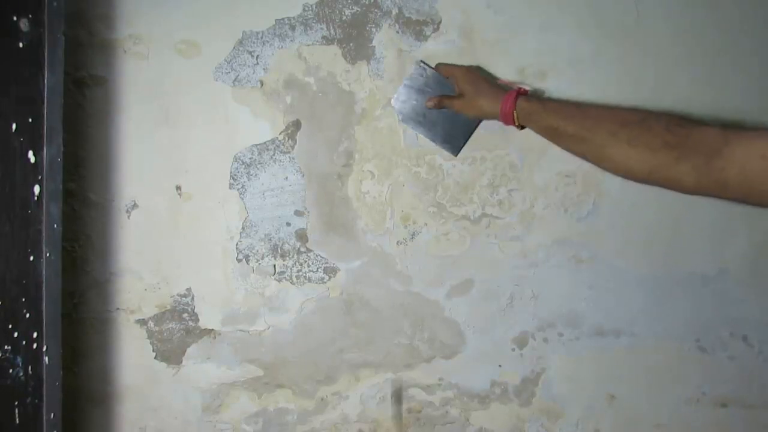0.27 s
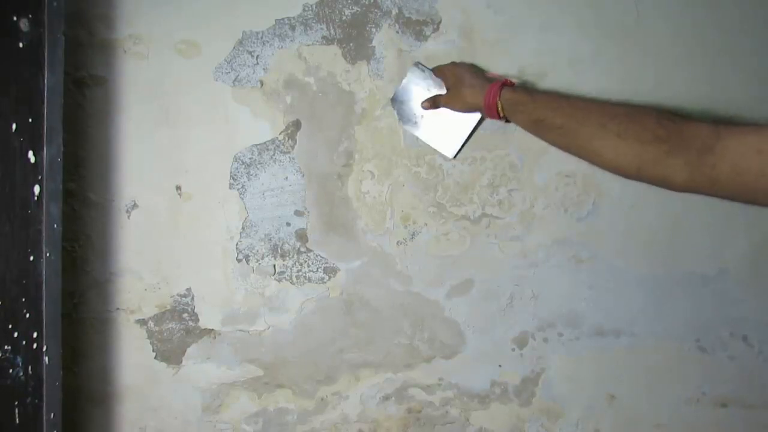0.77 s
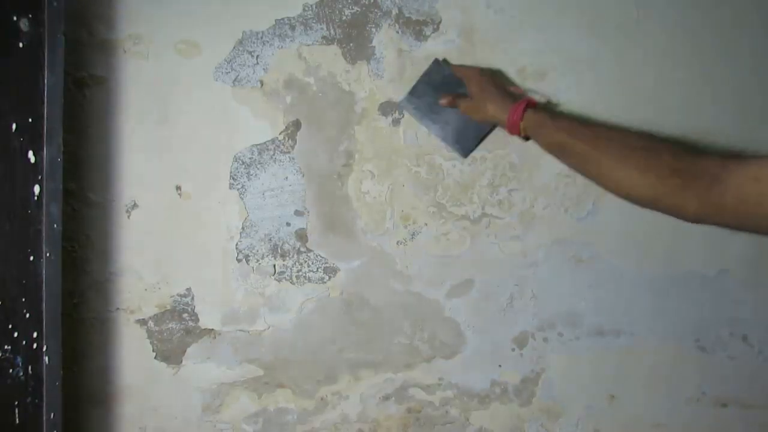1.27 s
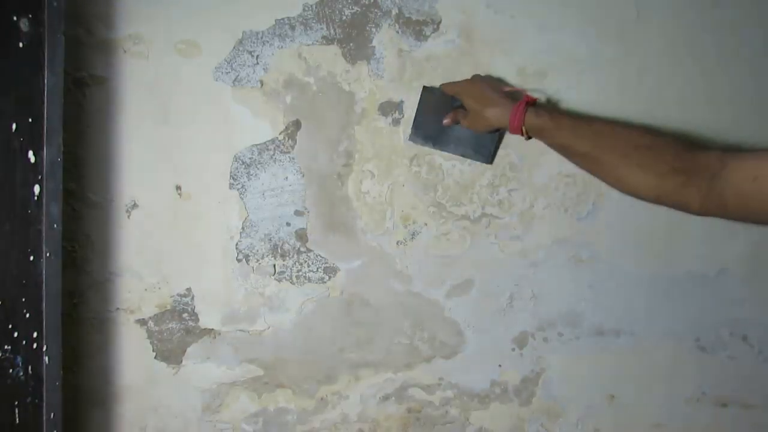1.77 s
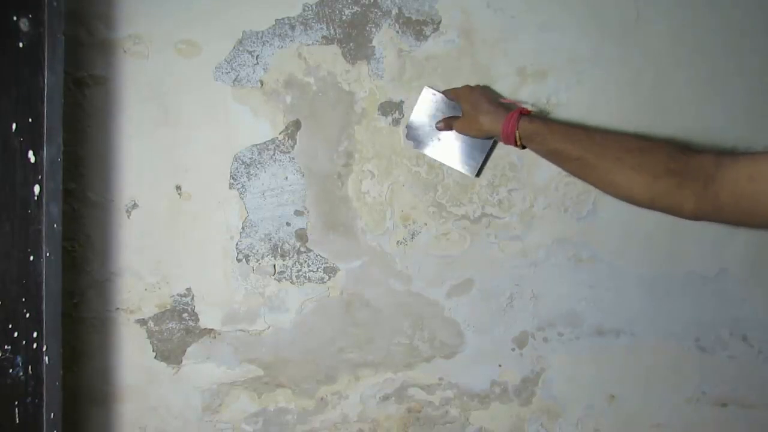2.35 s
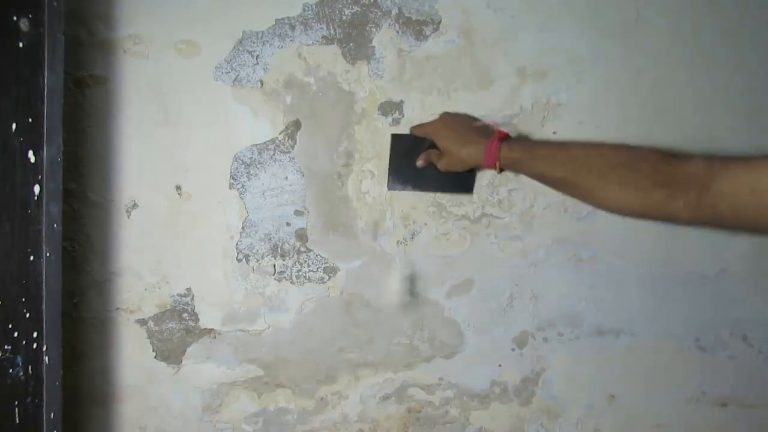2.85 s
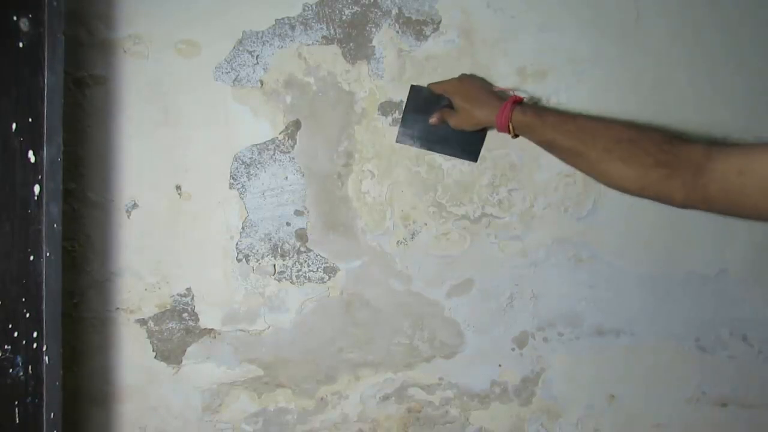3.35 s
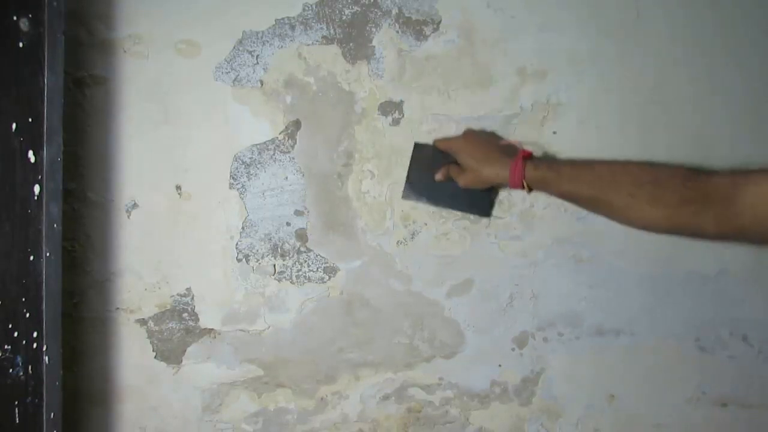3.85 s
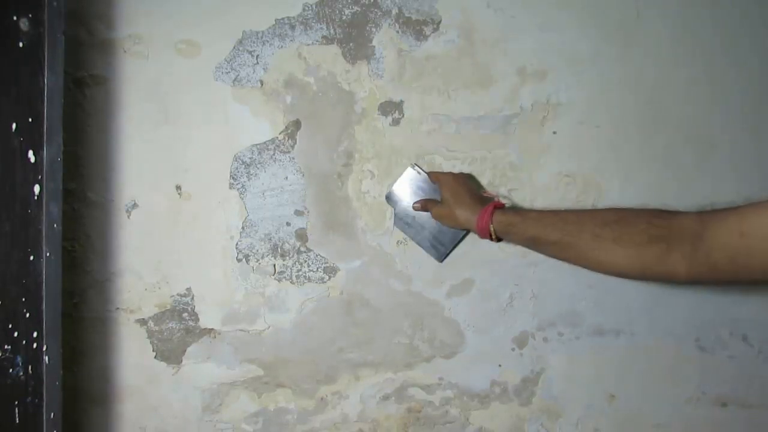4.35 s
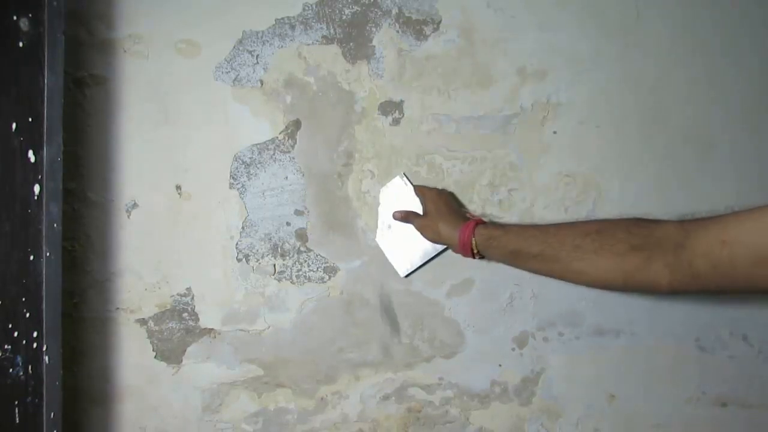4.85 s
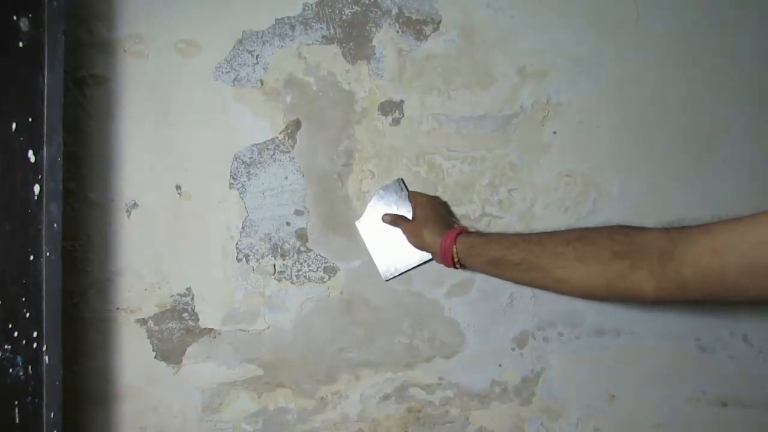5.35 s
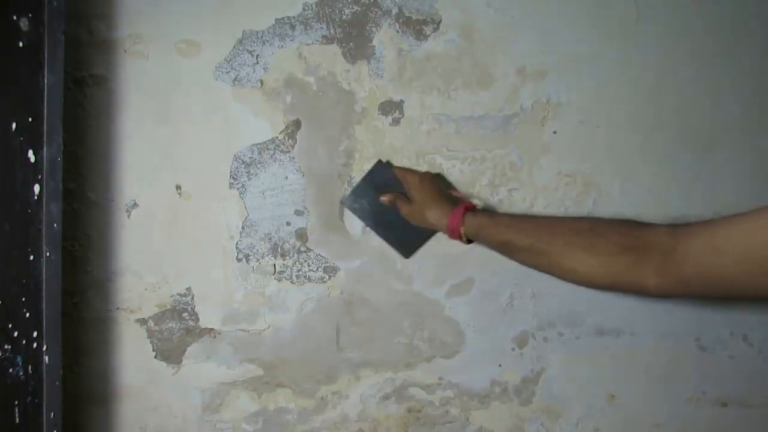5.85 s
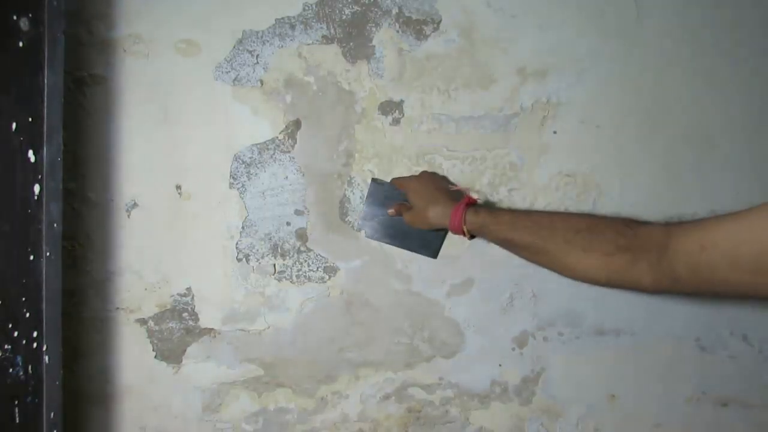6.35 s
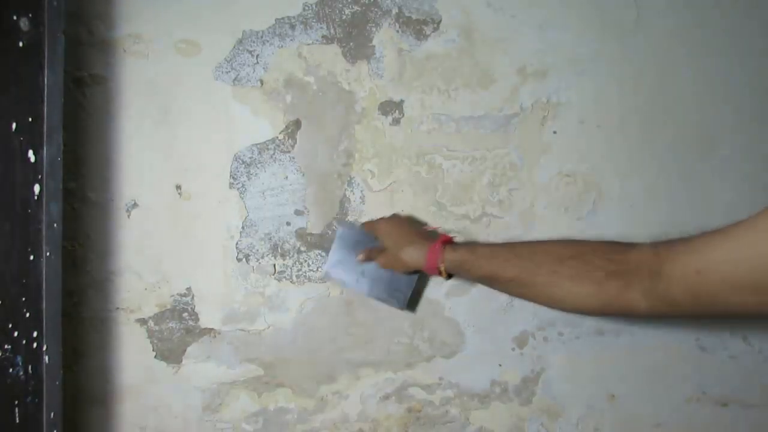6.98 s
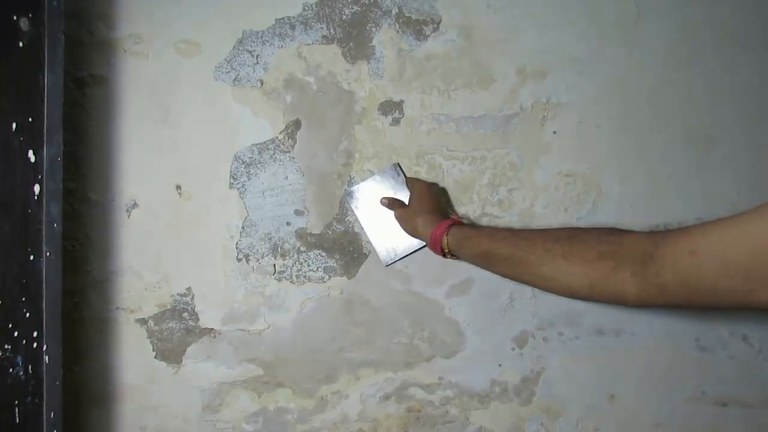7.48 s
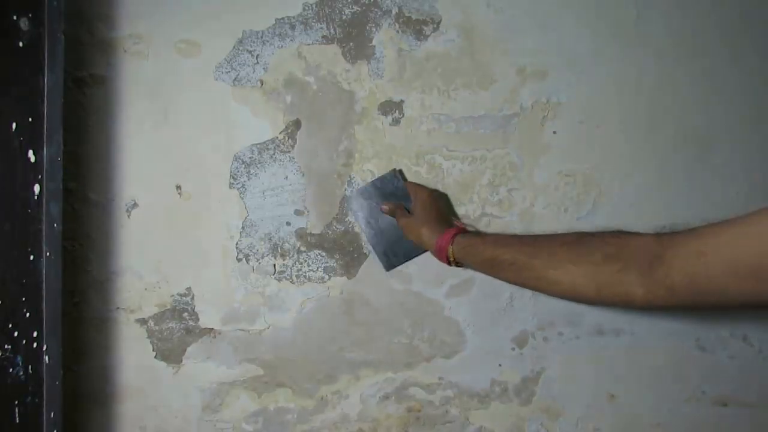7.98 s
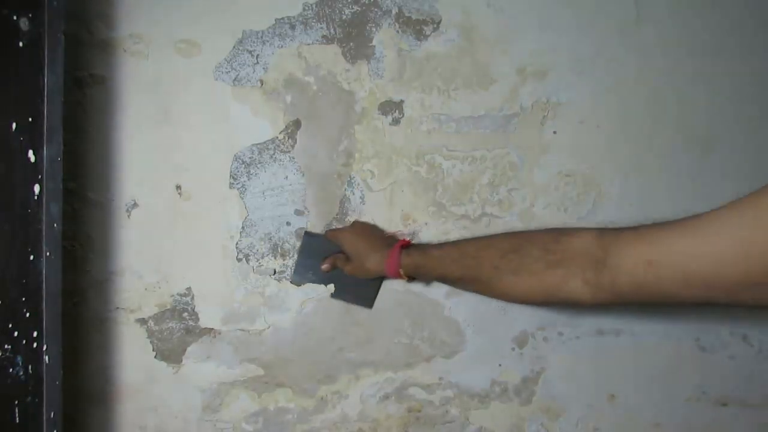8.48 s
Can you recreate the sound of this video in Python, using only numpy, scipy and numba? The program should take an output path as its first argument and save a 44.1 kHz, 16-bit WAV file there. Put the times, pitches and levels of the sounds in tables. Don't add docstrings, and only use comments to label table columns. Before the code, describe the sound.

Short gritty scrapes of a metal scraper break brittle plaster off a hard wall in irregular snaps, over faint traffic rumble.

```python
import sys
import numpy as np
from scipy import signal
from scipy.fft import rfft, irfft
from scipy.io import wavfile
from scipy.ndimage import uniform_filter1d, minimum_filter1d
from numba import njit

SR = 44100
rng = np.random.default_rng(int(sys.argv[2]) if len(sys.argv) > 2 else 0)


def materialize(psi):
    bounded = np.clip(np.atleast_2d(psi).T, -1, 1)
    quanta = np.round(bounded * 32767).astype(np.int16)
    wavfile.write(sys.argv[1], SR, quanta)


def natural_amplitude(level_db):
    exponent = np.asarray(level_db, float) / 20
    return 10 ** exponent


N = 384552

# (t/s, peak level/dB, ring f/Hz)
FLAKE_SNAPS = [(0.2418, 1, 7500), (1.0768, -14.5, 8200), (1.1054, 6.5, 4800), (2.9008, -3, 9100),
               (3.0806, -14, 10000), (4.8667, 5, 7500), (5.1769, 6, 6470), (5.6771, -4.5, 7840),
               (5.721, -4, 8450), (5.7818, -5, 8520), (5.84, 0.5, 8400), (6.223, -3.5, 9700),
               (6.3148, 0.5, 6650), (7.0787, -12, 5870), (8.7028, -5, 7900)]
# (t/s, peak level/dB, ring f/Hz, snap level re ring/dB)
EDGE_CATCHES = [(0.3606, -7.5, 2050, -15), (0.4913, -16.5, 1660, -10), (0.5611, -9, 1740, -34),
                (0.634, -13, 1680, -16), (1.3773, -7, 2350, -12), (2.6668, -7.5, 1760, 0),
                (2.7656, -4, 1720, -5), (3.4381, 6, 2500, -14), (3.7599, -13.5, 2070, -29),
                (4.4044, -6, 1610, -9), (4.4179, 9, 1830, -10), (4.8379, -2, 1820, -8),
                (5.6456, -9, 1610, -24), (5.9434, -4.5, 1860, -20), (6.2357, -2, 2490, -16),
                (6.3616, -8.5, 1740, -8), (6.5889, -5, 1780, -16), (6.9835, -19.5, 1680, -8),
                (7.7674, -14, 1770, -31), (7.9229, -8.5, 1910, -5.5), (8.2137, -10, 1520, -18),
                (8.4672, -9, 1480, -20)]
# (t/s, peak level/dB, ring f/Hz, snap level re ring/dB)
PLASTER_CRACKS = [(0.1278, -8.5, 1700, 3.5), (0.5877, 3, 1800, -8), (0.758, -2.5, 1800, -4.5),
                  (0.7983, -10.5, 2270, -6), (0.8929, -4.5, 1930, 0), (0.9555, 4.5, 1600, -3),
                  (1.5652, -1.5, 3060, 4), (1.7673, -3.5, 2260, 1.5), (1.9358, -12.5, 2640, -2),
                  (1.9805, -8.5, 2510, -3), (2.0512, 6.5, 1740, 3), (2.3082, -8.5, 1910, 2.5),
                  (2.4925, 0, 2270, -1.5), (2.5537, 12, 2060, 6.5), (2.9946, -9.5, 2450, 0),
                  (4.0178, -8.5, 1810, 3.5), (4.2764, -4.5, 1930, -4), (4.2896, -5.5, 3170, -19),
                  (4.514, 1.5, 1680, -2), (5.3294, 1, 2900, 0), (5.44, -2, 1960, 2.5),
                  (6.0071, 5, 2940, 2.5), (6.1456, -19.5, 2860, 0.5), (6.4472, -3.5, 1910, 1),
                  (6.7979, 0.5, 3150, 2.5)]


def rasp():
    # (f/Hz, level per Hz/dB)
    grit_colour = [(1470, -55), (2500, -12.5), (3610, -3.5), (6520, -3), (8840, -4), (9930, -6),
                   (13600, -12.5), (16100, -23)]
    blade_db, grit_db, wall_db, bend_hz = hand()
    stutter_db = 0.8 * walk(45) + 1.3 * walk(130)

    slips = grains(per_s=1300, spread_db=3, top_db=10, smear_s=0.0014)
    bend_hz = bend_hz * (1 + 0.04 * walk(25))
    bend = svf(svf(slips, bend_hz, 2100.0), bend_hz, 1070.0)
    steel = level(bend, -1.23) + level(blade(slips), -7.5)
    wall = level(band(band(slips, 860, 1000), 860, 1000), -9.5)

    dust = grains(per_s=2200, spread_db=3.2, top_db=11, smear_s=0.0007)
    grit = level(colour(dust, grit_colour), -0.8) + natural_amplitude(-5) * chips()
    uneven_grit = natural_amplitude(grit_db + 1.67 * walk(90)) * grit
    return natural_amplitude(blade_db - 0.5 + stutter_db) * (steel - natural_amplitude(wall_db) * wall + uneven_grit)


def hand():
    # (start t/s, length t/s, blade level/dB, grit level re blade/dB, bend f/Hz)
    pushes = [(0.602, 0.11, -10, -7.5, 1850), (1.327, 0.081, -27, -2, 2400), (1.421, 0.083, -16, -1, 3300),
              (1.523, 0.054, -17.5, -3, 3000), (1.827, 0.029, -29, -23, 2400),
              (2.116, 0.051, -21.5, -2, 1900), (2.283, 0.066, -20.5, -9, 2000),
              (2.379, 0.12, -25.5, -3.5, 2250), (2.678, 0.18, -13.5, -6, 1900),
              (3.784, .14, -27.5, -13.5, 1850), (3.92, 0.15, -25, -3, 2000),
              (4.153, .12, -20.5, -9.5, 1850), (4.606, 0.036, -26.5, -8, 1800),
              (4.923, .05, -27.5, -6, 2000), (5.284, 0.031, -27, -14, 1850), (5.62, 0.1, -26.5, -2.5, 2700),
              (5.883, 0.1, -16.5, -11, 1780), (6.422, 0.072, -10, -22, 1820),
              (7.75, 0.029, -27.5, -14.5, 1800), (8.094, 0.18, -15, -12.5, 1850),
              (8.436, 0.19, -12, -8.5, 1800)]
    # (start t/s, length t/s, blade level/dB, grit level re blade/dB, bend f/Hz)
    slides = [(0., 0.0063, -13.5, -7.5, 2000), (0.71, 0.067, -25, -2.5, 2060),
              (1.979, 0.048, -13, -2.5, 2200), (2.204, 0.23, -30.5, -12, 1900),
              (3.448, 0.085, -10, -5.5, 2300), (4.066, 0.26, -28.5, -8, 1870),
              (4.295, 0.6, -24, -10.5, 1770), (5.322, 0.14, -18, -12, 2450), (6.214, 0.22, -24, 0.5, 2170),
              (6.591, 0.037, -12, -8, 1830), (7.006, 0.16, -38.5, 3, 1690), (7.455, .01, -34, 5, 2980),
              (7.572, 0.045, -36.5, -13.5, 2600), (8.252, 0.19, -18, -10.5, 1950),
              (8.471, 0.12, -9.5, -28, 1490)]
    # (start t/s, length t/s, blade level/dB)
    grazes = [(0.053, .09, -36), (.16, 0.089, -43), (0.396, 0.14, -37.5), (1.137, 0.099, -30.5),
              (1.617, 0.2, -33), (1.88, 0.16, -40), (3.105, 0.31, -38.5), (4.704, 0.091, -59),
              (4.998, 0.25, -43), (5.556, .08, -29), (6.106, 0.22, -45)]
    # (start t/s, length t/s, level/dB)
    showers = [
        (2.76, 0.21, -23),
        (3.006, 0.15, -32.5),
        (5.666, 0.055, -20),
        (5.772, 0.076, -27),
        (6.27, 0.04, -39),
        (7.028, 0.17, -35),
    ]
    # (t/s, wall level re blade/dB)
    hollowness = [
        (0., -5),
        (1.0, -12),
        (2.8, -13),
        (3.9, -11.5),
        (4.5, -9.5),
        (5.2, -7.5),
        (6.5, -20),
        (8.3, -11.5),
        (8.5, -1),
    ]
    rest_db, rest_grit_db, light_bend_hz = -58, -7.5, 1950
    trail_db, trail_db_per_s = -17.5, 295
    dust_db, dust_db_per_s = -20, 228
    step = 16
    t = np.arange(0, N + step, step) / SR

    def trail(start, db, fall):
        return (t > start) * natural_amplitude(2 * (db - fall * np.clip(t - start, 0, 1)))

    parts = [(natural_amplitude(2 * rest_db), rest_grit_db, light_bend_hz)]
    for start, length, db, grit_db, hz in pushes:
        parts.append((contact(t, start, length, db, True), grit_db, hz))
    for start, length, db, grit_db, hz in slides:
        parts.append((contact(t, start, length, db, False), grit_db, hz))
    for start, length, db in grazes:
        parts.append((contact(t, start, length, db, False), rest_grit_db, light_bend_hz))
    for start, db, hz, snap_db in EDGE_CATCHES + PLASTER_CRACKS:
        parts.append((trail(start, min(db, 3) + trail_db, trail_db_per_s), snap_db, hz))

    steel = sum(power for power, grit_db, hz in parts)
    fine = sum(power * natural_amplitude(2 * grit_db) for power, grit_db, hz in parts)
    fine = fine + sum(contact(t, start, length, db, False) for start, length, db in showers)
    fine = fine + sum(trail(start, db + dust_db, dust_db_per_s) for start, db, hz in FLAKE_SNAPS)
    bend_hz = sum(power * hz for power, grit_db, hz in parts) / steel
    wall_db = np.interp(t, *np.transpose(hollowness))
    controls = 10 * np.log10(steel), 10 * np.log10(fine / steel), wall_db, bend_hz
    return [np.interp(np.arange(N) / SR, t, control) for control in controls]


def contact(t, start, length, db, build):
    t = t - start
    if build:
        shape_db = -12.5 * np.clip(1 - t / (0.64 * length), 0, 1)
        lean_s = 0.028
    else:
        shape_db = -6 * np.clip(t / length, 0, 1)
        lean_s = 0.002
    release_db = 385 * np.clip(t - length, 0, 1)
    return np.clip(t / lean_s, 0, 1) * natural_amplitude(2 * (db + shape_db - release_db))


def blade(push):
    # (f/Hz, width f/Hz, level/dB)
    blade_modes = [(1004, 95, 18.5), (1506, 400, 20), (1572, 7.7, 28), (2000, 460, 13.5), (2450, 41, -85),
                   (2900, 37, -9), (4020, 24, 20.5), (4980, 1400, 5.5), (6020, 67, 15.5), (8300, 120, -12)]
    out = 0
    for k, (hz, width, db) in enumerate(blade_modes):
        out = out + (-1) ** k * natural_amplitude(db) * band(push, hz, width)
    return out


def chips():
    out = 0
    for hz in (2450, 2680, 3600, 4670, 6070, 8340):
        ticks = grains(per_s=25, spread_db=4, top_db=9, smear_s=0.007)
        wandering_hz = hz * (1 + 0.1 * walk(12))
        out = out + level(svf(ticks, wandering_hz, 0.06 * hz), 0)
    return level(out, 0)


def grains(per_s, spread_db, top_db, smear_s):
    size_db = np.minimum(spread_db * rng.exponential(size=N), top_db)
    size = (rng.random(N) < per_s / SR) * natural_amplitude(size_db)
    burst = signal.lfilter([1], [1, -np.exp(-1 / (smear_s * SR))], size)
    return level(burst * rng.standard_normal(N), 0)


def cracks():
    out, t = np.zeros(N + 4096), np.arange(4096) / SR
    high = signal.butter(2, 4500, "high", fs=SR, output="sos")
    for start, db, hz, snap_db, body_db, knock_db in breaks():
        noise = rng.standard_normal((3, len(t)))
        fade = np.exp(-t / 0.0024) + natural_amplitude(-16.5) * np.exp(-t / 0.023)
        blow = (1 - np.exp(-t / 0.0013)) * fade
        ragged_db = 2.5 * uniform_filter1d(noise[2], 30) * np.sqrt(30)
        blow = blow * natural_amplitude(ragged_db)
        ring = level(band(band(noise[0], hz, 0.4 * hz), hz, 0.8 * hz), 0)
        snap = level(signal.sosfilt(high, noise[1]), snap_db)
        body = level(band(noise[0], 2600, 1360), body_db)
        burst = blow * (ring + snap + body)
        knock = band(t * np.exp(-t / 0.00052), 720, 490)
        knock = band(knock, 570, 850)
        knock = natural_amplitude(knock_db + 7.0) * knock / np.abs(knock).max()
        burst = burst / np.abs(burst).max() + knock
        i = int(start * SR)
        out[i:i + len(t)] += natural_amplitude(min(db, 3) + 0.5) * burst
    return out[:N]


def breaks():
    # (t/s, knock level re peak/dB)
    thumps = [
        (1.105, -30.5),
        (2.051, -34),
        (4.515, -25),
        (4.866, -27.5),
        (6.798, -19),
    ]
    rows = [(*row, -3.5) for row in EDGE_CATCHES + PLASTER_CRACKS]
    rows += [(*row, 0.5, -10.5) for row in FLAKE_SNAPS]
    out = []
    for row in rows:
        knocks_db = [-36] + [db for start, db in thumps if abs(start - row[0]) < 0.008]
        out.append((*row, max(knocks_db)))
    return out


def crumbs():
    # (t/s, peak level/dB, ring f/Hz)
    crumb_ticks = [(2.0009, -16, 2550), (2.8584, 9.5, 6700), (3.029, -14, 7070), (3.0575, -12, 7500),
                   (3.127, -9, 5400), (3.276, -27, 1350), (3.34, -30, 1060), (5.0603, -20, 5700),
                   (5.1184, -18.5, 7400), (5.2046, 1.5, 6500), (5.414, -10, 1390), (5.5798, -12, 7200),
                   (5.6045, -14, 4500), (5.6775, -9, 3580), (5.7394, -12, 8670), (6.757, -19, 9200),
                   (6.8026, 4, 3600), (6.815, -15, 3470), (7.03, -13.5, 1720), (7.1094, -21, 8240),
                   (7.1442, -16, 7350), (7.191, -11, 8600), (7.615, -25, 1690), (8.4951, -3.5, 1420)]
    out, t = np.zeros(N + 1024), np.arange(1024) / SR
    for start, db, hz in crumb_ticks:
        tick = rng.standard_normal(len(t)) * np.exp(-t / 0.00046)
        ring = band(tick, hz, 0.061 * hz)
        click = natural_amplitude(6.5) * np.diff(tick, prepend=0) / np.abs(tick).max()
        i = int(start * SR)
        out[i:i + len(t)] += natural_amplitude(db - 4.5) * (ring / np.abs(ring).max() + click)
    return out[:N]


def ports(x):
    t = np.arange(2048) / SR
    scatter = rng.standard_normal(len(t)) * np.exp(-t / 0.0047)
    scatter = signal.sosfilt(signal.butter(1, 6000, "high", fs=SR, output="sos"), scatter)
    scatter = scatter / np.sqrt(np.sum(scatter ** 2))
    side = natural_amplitude(-5.0) * signal.fftconvolve(x, scatter)[:N]
    side = side - natural_amplitude(-14.0) * band(x, 13000, 6000) + natural_amplitude(-13) * band(x, 500, 400)
    return np.array([x + side, x - side])


def room(x):
    low_t60_s, top_t60_s, room_db = 0.31, 0.24, -5.5
    t = np.arange(SR // 2) / SR
    noise = rng.standard_normal((2, len(t))) * np.clip((t - 0.002) / 0.00091, 0, 1)
    low = signal.sosfilt(signal.butter(1, 5000, fs=SR, output="sos"), noise)
    tail = low * 1000 ** (-t / low_t60_s) + (noise - low) * 1000 ** (-t / top_t60_s)
    tail = tail / np.sqrt(np.sum(tail ** 2) / 2)
    return natural_amplitude(room_db) * signal.fftconvolve(x[None], tail, axes=1)[:, :N]


def outside():
    # (t/s, level/dB)
    rumble_swell = [(0.0, -38), (0.97, -36), (1.12, -41), (1.67, -38), (3.02, -42), (3.1, -37), (3.8, -38),
                    (6.14, -43), (6.58, -39.5), (6.9, -48), (7.29, -42), (8.72, -36)]
    # (f/Hz, level per Hz/dB)
    traffic_colour = [(15, -48), (25, -22), (59, -4.5), (117, -8.5), (134, -9), (277, -10), (354, -12),
                      (516, -5.5), (659, -8), (863, -11.5), (936, -9), (10700, -39.5), (16000, -67)]
    # (f/Hz, rms level/dB)
    motor_tones = [(274.5, -55), (468.3, -50), (511.4, -59.5), (559.9, -58)]
    mid, side = rng.standard_normal((2, N))
    air = colour(np.array([mid + 1.09 * side, mid - 0.71 * side]), traffic_colour)
    bass = signal.sosfilt(signal.butter(2, 350, fs=SR, output="sos"), air)
    scale = 1 / np.sqrt(np.mean(bass ** 2))
    t = np.arange(N) / SR
    swell_db = np.interp(t, *np.transpose(rumble_swell))
    hum = 0
    for hz, db in motor_tones:
        strength = np.sqrt(2) * natural_amplitude(db + 2 * walk(6.2))
        hum = hum + strength * np.sin(2 * np.pi * hz * t + 1.62 * walk(3.7))
    return scale * (natural_amplitude(swell_db + 4.5) * bass + natural_amplitude(-46) * (air - bass)) + hum


def level(x, db):
    return x * natural_amplitude(db) / np.sqrt(np.mean(x ** 2))


def colour(x, points):
    hz, db = np.transpose(points)
    f = np.fft.rfftfreq(x.shape[-1], 1 / SR) + 1
    gain = natural_amplitude(np.interp(np.log(f), np.log(hz), db))
    return irfft(rfft(x) * gain, x.shape[-1])


@njit
def svf(x, hz, width):
    y, b, l = np.empty(len(x)), 0., 0.
    for i in range(len(x)):
        g, k = np.tan(np.pi * hz[i] / SR), width / hz[i]
        v = (b + g * (x[i] - l)) / (1 + g * (g + k))
        b, l, y[i] = 2 * v - b, l + 2 * g * v, k * v
    return y


def band(x, hz, width):
    return svf(x, np.full(len(x), 1. * hz), 1. * width)


def walk(rate):
    k = int(SR / rate)
    held = np.repeat(rng.standard_normal(N // k + 1), k)
    return uniform_filter1d(held, k)[:N] * 1.2


def scene():
    near = rasp() + cracks() + crumbs()
    return ports(near) + room(near) + outside()


def band_limit(x):
    return signal.sosfilt(signal.butter(12, 16250, fs=SR, output="sos"), x)


def record(dry):
    high = dry - signal.sosfiltfilt(signal.butter(2, 2200, fs=SR, output="sos"), dry)
    now = uniform_filter1d(np.abs(high).mean(axis=0), 90)
    coming = -minimum_filter1d(-now, size=520, origin=-259)
    dropped = uniform_filter1d(1. * (now < natural_amplitude(-21) * coming), size=60)
    clipped = np.clip(dry - 0.7 * dropped * high, -1, 1)
    cut = signal.sosfilt(signal.butter(12, 15500, fs=SR, output="sos"), clipped)
    return band_limit(cut)


dry = scene()
out = record(dry)
materialize(out)
```